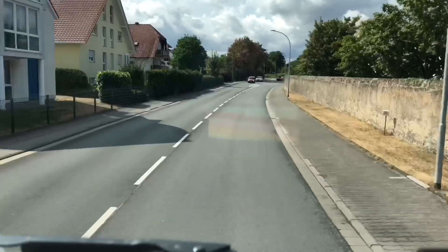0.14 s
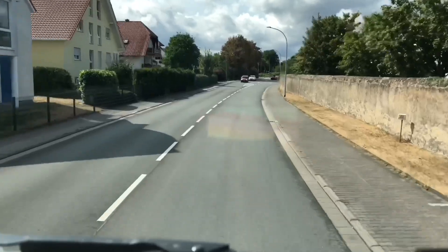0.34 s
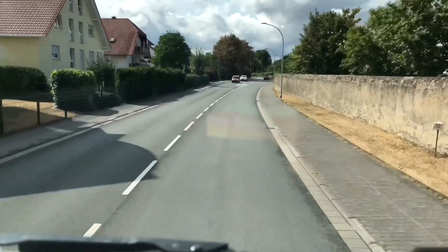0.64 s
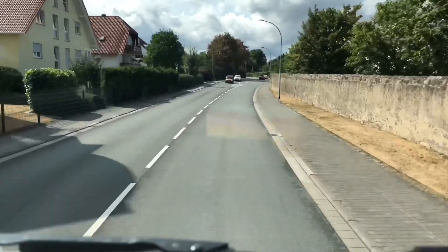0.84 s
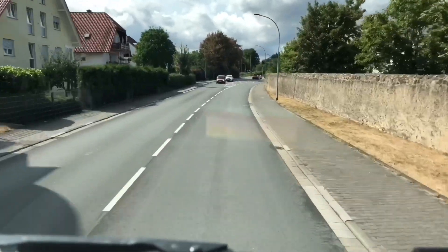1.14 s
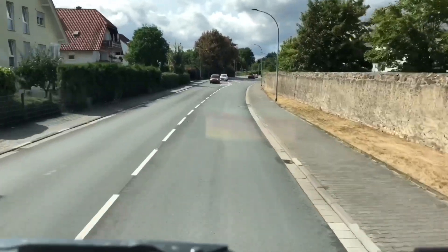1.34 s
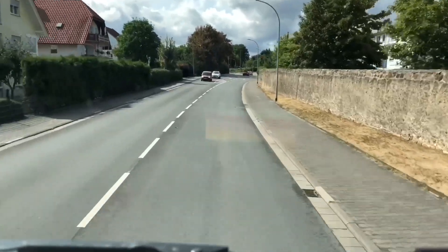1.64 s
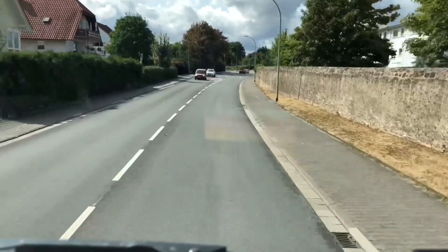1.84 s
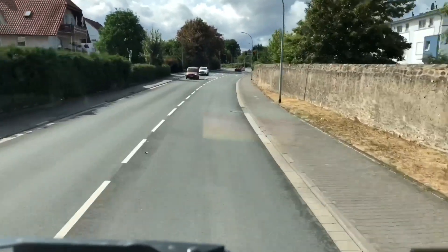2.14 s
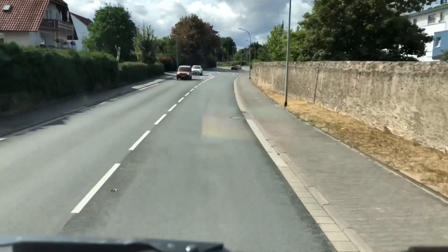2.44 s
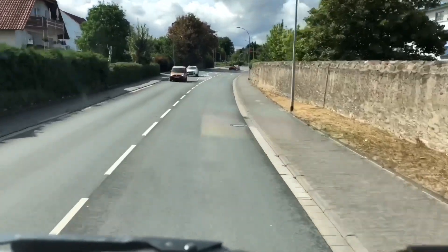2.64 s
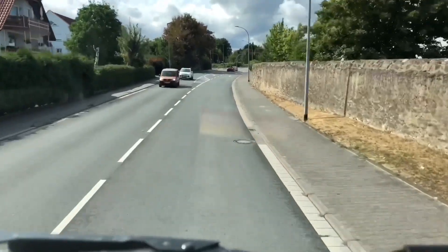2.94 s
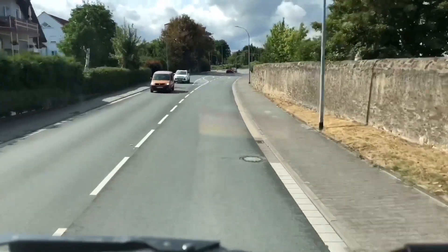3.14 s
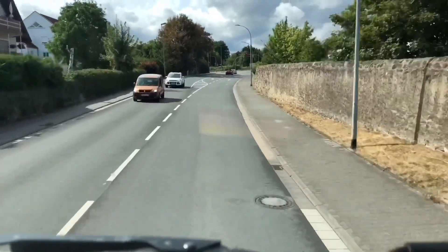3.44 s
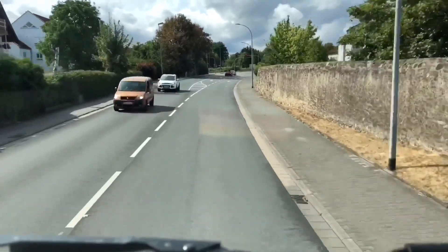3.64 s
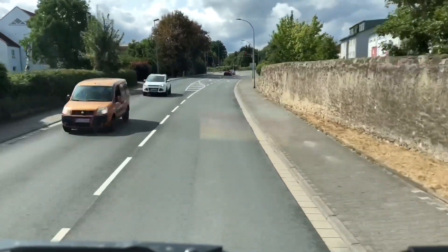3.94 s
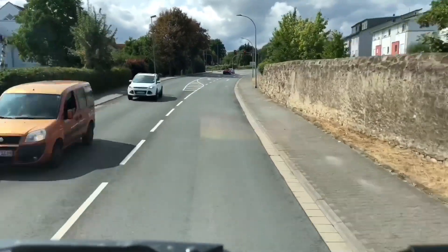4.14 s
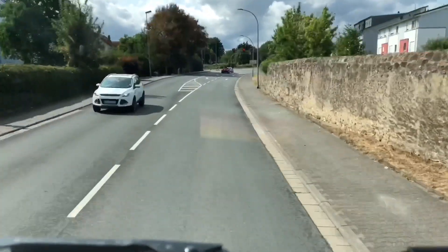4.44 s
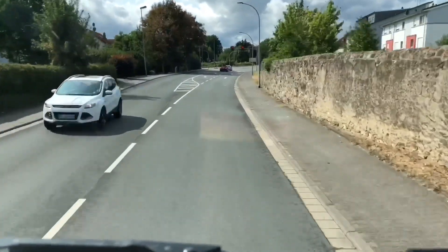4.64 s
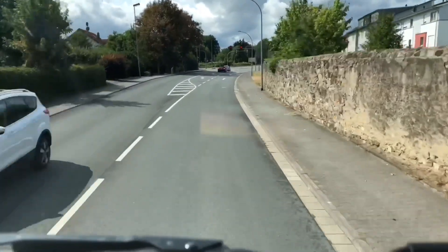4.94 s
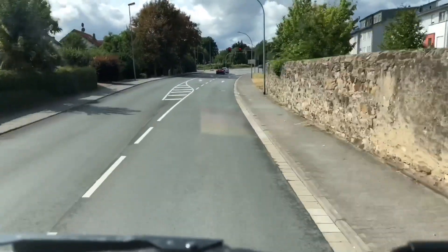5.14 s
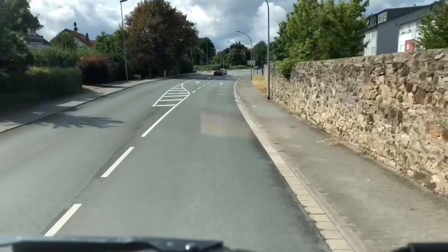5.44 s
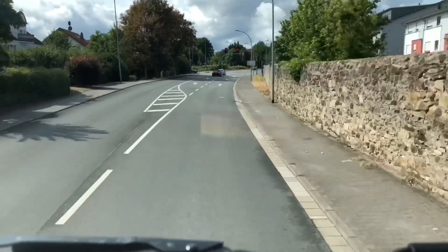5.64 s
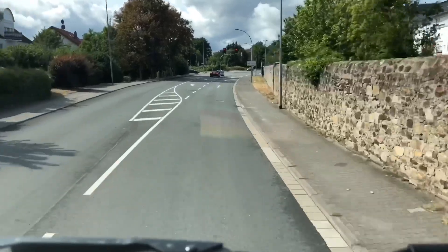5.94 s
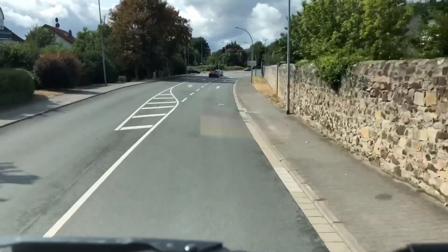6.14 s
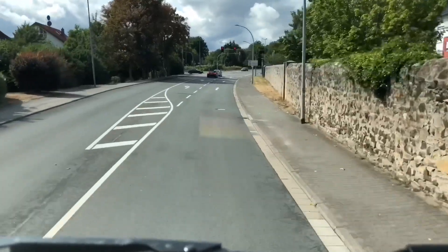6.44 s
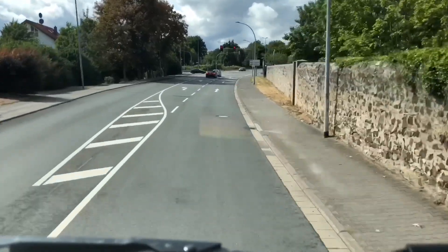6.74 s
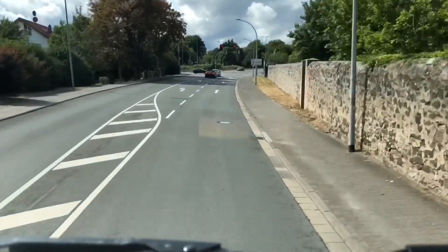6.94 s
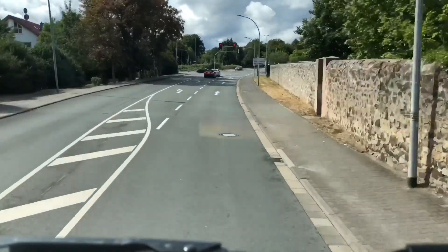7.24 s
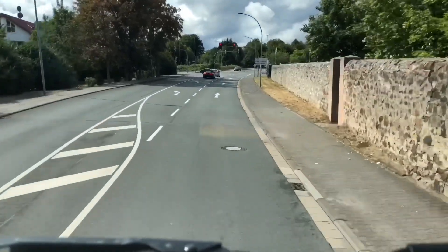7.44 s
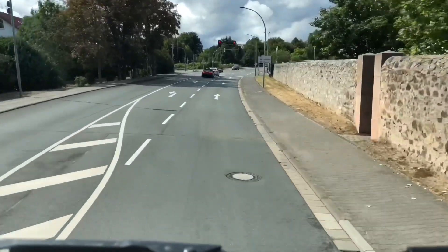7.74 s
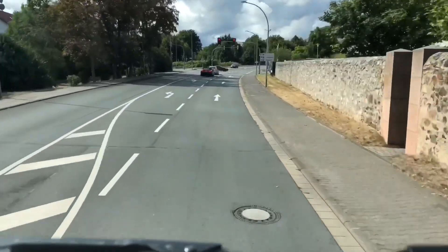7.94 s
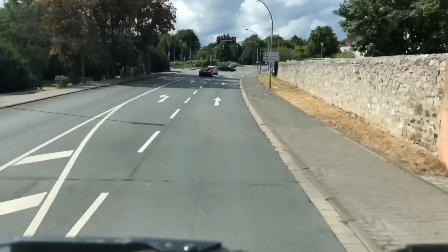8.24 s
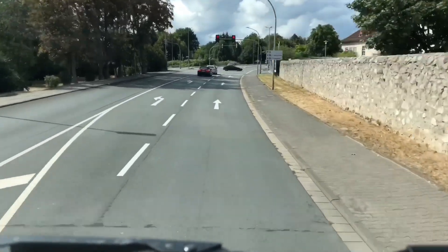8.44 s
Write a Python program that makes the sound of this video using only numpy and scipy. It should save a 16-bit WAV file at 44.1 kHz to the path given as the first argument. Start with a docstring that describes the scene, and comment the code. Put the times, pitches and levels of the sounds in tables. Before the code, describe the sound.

Inside the cab of a heavy truck on a road, a six-cylinder diesel booms and clatters under full load, with gear whine and bright intake hiss. It lifts for an upshift, its pitch drops and the turbo whistle sinks. A softer second pull follows, then coasting over tyre wash and road rumble. A strong air blow-off spits out past six seconds, and rushing air swells at the end.

```python
"""Inside the cab of a six-cylinder diesel truck that pulls hard, shifts up at 1.5 s, pulls again and slows.
Sines locked to the engine cycle make the boom, the air compressor that beats against it, and the gear whine.
Clatter is noise, partly repeated in every cycle; the turbo is a gliding noise band that sinks after each pull.
Filtered noise gives road, tyres, intake, one strong blow-off among weaker puffs, and rushing air that swells
at the end."""
import sys
import numpy as np
from scipy import signal
from scipy.fft import rfft, irfft
from scipy.io import wavfile

SR = 44100
rng = np.random.default_rng(int(sys.argv[2]) if len(sys.argv) > 2 else 0)


def generate_wav(signal):
    """Clip the signal to [-1, 1] and save it as 16-bit WAV at the path in sys.argv[1]."""
    frames = np.transpose(np.atleast_2d(signal))
    scaled = np.clip(frames, -1, 1) * 32767
    pcm = np.round(scaled).astype(np.int16)
    wavfile.write(sys.argv[1], SR, pcm)


N = 379701  # samples
T = np.arange(N) / SR  # time [s]
HZ = np.fft.rfftfreq(N, 1 / SR)  # frequency of each spectral bin [Hz]

# An order is a multiple of the four-stroke cycle (two revolutions); six cylinders fire in each cycle.
FIRING_ORDER = 6
COMPRESSOR_ORDER = 5.653
FULL_POWER_RPM = 1788
FIRING_COAST_DB, FIRING_PULL_DB = -36.8, -22  # before the lift of the cab modes
TURBO_IDLE_HZ, TURBO_COAST_S = 7700, 1.15  # pitch the run-down approaches, and its time constant
EDGE_HZ = 15740  # upper band limit

# Relative noise spectra: f/Hz, level/dB (per Hz)
# tyre and body rumble
ROAD_SPECTRUM = [(20, -28), (40, -13), (62, -8), (90, -8), (130, -1), (190, -2.5), (270, -5), (340, -4),
                 (470, -14), (650, -15.5), (950, -24), (2000, -50)]
# steady wash of the tyres heard through the glass
WASH_SPECTRUM = [(300, -24), (800, -6), (1200, 2.5), (1700, -9), (2300, -7), (2900, -10), (3800, -7),
                 (4900, -9), (6200, -11), (7200, -14), (9000, -14), (11000, -19.5), (13000, -32),
                 (15700, -42)]
# rushing air
AIR_SPECTRUM = [(500, -3), (1400, -7.5), (2400, .5), (3200, 1), (4600, -7.5), (6300, -8), (7200, -10),
                (10000, -12), (12500, -18), (15700, -23)]
# intake hiss
INTAKE_SPECTRUM = [(500, -32), (1400, -1.5), (2400, -.5), (3200, 0.5), (4200, -1.5), (5100, -3.5),
                   (6300, -9), (7000, -11), (10000, -11), (12500, -15.5), (15700, -18.5)]
# puffs of the air system
PURGE_SPECTRUM = [(1500, -28), (3200, -6), (4500, -5), (6000, -2), (7500, -4), (10000, -1.5), (13000, -4),
                  (15700, -8)]
# combustion clatter
ROAR_SPECTRUM = [(40, -35), (90, 2), (180, 2), (320, 1), (460, -1), (700, -1), (900, -4.5), (1300, -6),
                 (1700, -13.5), (2400, -18.5), (5000, -38), (16000, -70)]

# Resonances of cab panels and engine covers: f/Hz, width/Hz, peak level/dB
PANEL_MODES = [(259, 9.9, 1), (713, 56, 1.5), (1032, 160, 2.5), (1390, 56, 6.5), (1590, 120, 1.5),
               (1760, 47, 3.5), (1940, 140, 0.5), (2316, 240, 5), (2757, 54, 3.5), (3000, 100, 3.5),
               (3100, 150, -5), (5000, 200, 2), (6060, 300, 1), (8800, 400, 0.5)]
# Air resonances of the cab: f/Hz, width/Hz, peak level/dB
CAB_AIR_MODES = [(67, 12, 8.5), (97.5, 5.9, 3.5), (135.3, 12, 13.5), (158.8, 12, 7.5), (194.6, 11.6, 13),
                 (262.7, 8.5, 8.5)]

# Engine speed: t/s, speed/(revolutions per minute)
ENGINE_SPEED = [(0, 1680), (.5, 1748), (1.05, 1815), (1.5, 1763), (1.75, 1631), (2.05, 1480), (2.4, 1412),
                (3, 1444), (3.55, 1476), (3.9, 1452), (4.15, 1472), (4.45, 1448), (4.9, 1464), (5.6, 1449),
                (6.4, 1421), (7, 1398), (7.8, 1343), (8.61, 1288)]
# Driver's foot, full pull, lift for the shift, second pull, ease off: t/s, load/(0 to 1)
ENGINE_LOAD = [(0, 1), (1.08, 0.9), (1.42, 0.48), (1.58, 0.08), (2.2, 0.02), (2.6, .33), (2.92, 0.63),
               (3.2, 0.57), (3.58, 0.78), (3.85, 0.29), (4.35, 0.05), (8.61, 0.11)]

# Swelling of the rushing air, before trim: t/s, level/dB
RUSH_LEVEL = [(0, -65), (4.5, -70), (5.4, -51), (6.15, -48.5), (7.1, -46.5), (7.8, -42), (8.05, -39),
              (8.61, -39)]
# Air-system puffs: start t/s, level/dB, hold t/s, decay time by 60 dB t/s
AIR_PUFFS = [(6.16, -53, 0.041, .2), (6.335, -34.5, 0.095, 0.72), (7.161, -53, .03, .2),
             (7.6, -58, .05, .2)]
# Whistle of the intake under full boost: t/s, f/Hz, level/dB
BOOST_WHISTLE = [(0, 11650, -56), (.8, 11540, -59), (1.15, 11300, -54), (1.35, 10790, -61),
                 (1.6, 9990, -72)]
# Whine of the driveline: t/s, f/Hz, level/dB
DRIVELINE_WHINE = [(3.9, 2172, -57), (5.5, 2158, -56), (6.5, 2114, -54), (7.4, 2047, -55.5),
                   (7.8, 1999, -64)]
# Whistle of a leaking air valve: t/s, f/Hz, level/dB
VALVE_WHISTLE = [(6.5, 4232, -70), (6.65, 4230, -50), (7.1, 4140, -54), (7.55, 4110, -54), (7.7, 4090, -70)]
# Turbo spooling up in the second pull: t/s, f/Hz, level/dB
TURBO_SPOOL_UP = [(2.5, 11800, -68), (2.95, 12270, -66), (3.3, 15320, -63), (3.5, 16400, -66)]
# Turbo run-downs: start t/s, end t/s, f at the start/Hz, level at the start/dB, fade/(dB per s)
TURBO_RUN_DOWNS = [(1.45, 2.4, 17150, -52, 20), (3.8, 6.1, 16750, -56.5, 3)]
# Gear meshes, before trim: tooth-mesh order, start t/s, end t/s, level at mid-time/dB, swell/(dB per s)
GEAR_MESHES = [(24.75, -.1, .6, -37.5, 0), (31, -.1, .6, -38, 0), (49.5, -.1, .86, -31.5, 3),
               (49.7, .82, 1.36, -41, 0), (74.4, -.1, 1.31, -35.5, 3), (64, 2.75, 3.65, -42, 2),
               (96, 2.75, 3.4, -43, -5), (31, 6.6, 7.9, -41, 0), (60.5, 6.7, 7.9, -45, 0)]
# Drone an octave above the firing rate: t/s, level/dB
DRONE_LEVEL = [(0.05, -18.5), (0.33, -28), (0.55, -18.5), (0.85, -16), (1.25, -27), (1.48, -27.5),
               (1.68, -18.5), (1.97, -36.5), (2.12, -25), (2.5, -28), (3.5, -20.5), (4.45, -31.5),
               (4.95, -26), (6.45, -32.5), (6.95, -23), (7.75, -40.5), (8.61, -29)]
# Lines that unequal cylinders add around the firing orders: order
UNEQUAL_ORDERS = [4, 5, 7, 8, 9, 10, 11, 13, 14, 15, 16, 17, 18, 19, 20, 21, 22, 23]
# One row for each unequal order, before trim and cab modes: level coasting/dB, level at full load/dB
UNEQUAL_LEVELS = [(-54, -47), (-50, -48), (-42.5, -36.5), (-52, -30.5), (-35.5, -31), (-40, -31.5),
                  (-53, -46), (-57, -46), (-43, -39), (-47, -39), (-58, -52), (-52, -43), (-52.5, -37),
                  (-55.5, -47), (-54.5, -45.5), (-56, -49), (-48, -54), (-58, -43)]


def gain_of(db):
    """Logarithmic law: 20 dB is a tenfold amplitude."""
    return 10 ** (np.asarray(db) / 20)


def evened(x):
    """Normalisation: equal mean-square power, rms 1."""
    return x / np.sqrt(np.mean(x ** 2) + 1e-20)


def curves(rows):
    """Linear interpolation: each column of a table becomes a curve over time."""
    s, *columns = np.transpose(rows)
    return [np.interp(T, s, c) for c in columns]


def read(points, hz):
    """Logarithmic frequency scale: straight lines join the points of a spectrum."""
    f, value = np.transpose(points)
    return np.interp(np.log(hz + 1), np.log(f + 1), value)


def drift(rate_hz):
    """Low-passed random process: a smooth wander of rms 1, changing at up to about rate_hz."""
    slow_hz = np.fft.rfftfreq(2048, T[-1] / 2048)
    spectrum = rfft(rng.standard_normal(2048)) / (1 + (slow_hz / rate_hz) ** 4)
    wander = irfft(spectrum)
    return evened(np.interp(T, np.linspace(0, T[-1], len(wander)), wander))


def peaks_db(resonances, hz):
    """Resonance: each mode shifts the level in dB by a bell-shaped peak around its centre."""
    return sum(peak / (1 + (2 * (hz - centre) / width) ** 2) for centre, width, peak in resonances)


def in_cab(x, spectrum, ripple_db=2.5, ripple_hz=45):
    """Linear filtering: source spectrum, panel resonances and the fine ripple of the cab's reflections."""
    db = read(spectrum, HZ) + peaks_db(PANEL_MODES, HZ)
    ripple = np.interp(HZ / ripple_hz, np.arange(1024), rng.standard_normal(1024))
    ripple_share = np.interp(HZ, [300, 1200, 5000, 9000], [0, 1, .9, .4])
    response = gain_of(db + ripple_db * ripple_share * ripple)
    return evened(irfft(rfft(x) * response, N))


def tone(turns):
    """Harmonic motion: a sine of rms 1 whose phase is given in turns."""
    return np.sqrt(2) * np.cos(2 * np.pi * turns)


def fuzzy(turns, width_hz):
    """Quadrature modulation: slow noise on a carrier makes a soft-skirted band around a moving pitch."""
    keep = np.exp(-np.pi * width_hz / SR)
    slow = rng.standard_normal((2, N))
    for _ in range(3):
        slow = signal.lfilter([1 - keep], [1, -keep], slow)
    return evened(slow[0] * tone(turns) + slow[1] * tone(turns + 1 / 4))


def hiss(spectrum, db, bright_db, flutter_db=0.72, split_hz=6500):
    """Turbulent flow: fluttering broadband noise whose top brightens and dulls."""
    flow = in_cab(rng.standard_normal(N), spectrum)
    top = irfft(rfft(flow) * HZ ** 4 / (HZ ** 4 + split_hz ** 4), N)
    brightened = flow - top + gain_of(bright_db) * top
    return gain_of(db + flutter_db * drift(15)) * brightened


def tyres(level_db=-45, swell_db=0.84):
    """Stationary noise: an even wash independent of the engine, so it stays when that falls quiet."""
    return gain_of(level_db + swell_db * drift(2.4)) * in_cab(rng.standard_normal(N), WASH_SPECTRUM)


def road(level_db=-29.7, bumps_db=1.5, rise_db_per_s=.12):
    """Random excitation: uneven asphalt makes tyre and body rumble swell, over a slow growth."""
    db = level_db + rise_db_per_s * T + bumps_db * drift(4.6)
    return gain_of(db) * in_cab(rng.standard_normal(N), ROAD_SPECTRUM)


def rush(trim_db=2.5, top_bright_db=5.5, bright_per_db=1.3,
         hum_hz=225, hum_width_hz=55, hum_db=-30.5, hum_per_db=2.0):
    """Flow noise: rushing air is brighter the harder it blows, with a low hum at its strongest."""
    db, = curves(RUSH_LEVEL)
    slack_db = db - db.max()  # 0 at the strongest flow, negative elsewhere
    hum = gain_of(hum_db + hum_per_db * slack_db) * fuzzy(hum_hz * T, hum_width_hz)
    return hum + hiss(AIR_SPECTRUM, db + trim_db, top_bright_db + bright_per_db * slack_db)


def intake(power, load, idle_db=-49.0, boost_db=14.6, lag_s=0.25,
           idle_bright_db=-4, boost_bright_db=5, lift_bright_db=5):
    """First-order lag: boost trails power, so the hiss is dull as it builds and bright when the foot lifts."""
    keep = np.exp(-1 / (lag_s * SR))
    boost = power[0] + signal.lfilter([1 - keep], [1, -keep], power - power[0])
    bright_db = idle_bright_db + boost_bright_db * boost + lift_bright_db * (boost - load)
    return hiss(INTAKE_SPECTRUM, idle_db + boost_db * boost, bright_db)


def puffs(rise_s=.01):
    """Pressure release: a valve snaps open, blows briefly, and the noise decays exponentially."""
    blow = np.zeros(N)
    for start, db, hold, t60 in AIR_PUFFS:
        opening = np.clip((T - start) / rise_s, 0, 1)
        decay_db = 60 * np.maximum(T - start - hold, 0) / t60
        blow += gain_of(db - decay_db) * opening
    return blow * in_cab(rng.standard_normal(N), PURGE_SPECTRUM)


def whistle(rows, width_hz, flicker_db=1.2):
    """Narrow-band noise: a breathy, flickering whistle glides along its table."""
    hz, db = curves(rows)
    sounding = (T >= rows[0][0]) & (T <= rows[-1][0])
    return sounding * gain_of(db + flicker_db * drift(11)) * fuzzy(np.cumsum(hz) / SR, width_hz)


def turbo(width_hz=1500, core_width_hz=380, core_db=1, skirt_fade_db_per_s=8, flicker_db=2.0, edge_s=0.15):
    """Exponential relaxation: after each pull the blade whistle sinks towards idle pitch, narrows and fades."""
    out = whistle(TURBO_SPOOL_UP, width_hz=1100)
    for start, end, top_hz, db, fade in TURBO_RUN_DOWNS:
        age = np.maximum(T - start, 0)
        hz = TURBO_IDLE_HZ + (top_hz - TURBO_IDLE_HZ) * np.exp(-age / TURBO_COAST_S)
        turns = np.cumsum(hz) / SR
        sounding = np.clip(np.minimum(age, end - T) / edge_s, 0, 1)
        # the wide band gives way to a narrow core
        skirt = gain_of(-skirt_fade_db_per_s * age)
        core = gain_of(core_db) * fuzzy(turns, core_width_hz)
        blades = skirt * fuzzy(turns, width_hz) + (1 - skirt) * core
        out += sounding * gain_of(db - fade * age + flicker_db * drift(11)) * blades
    return out


def compressor(cycles, rpm, level_db=-28, fall_db_per_rpm=0.13, loud_rpm=1350, upper_db=-13):
    """Beats: geared just under the firing rate, it beats with the boom about four times a second."""
    turns = COMPRESSOR_ORDER * cycles
    db = level_db - fall_db_per_rpm * np.maximum(rpm - loud_rpm, 0)  # loudest at low speed
    upper = gain_of(upper_db) * tone(turns * 3 / 2)  # a fifth above
    return gain_of(db) * (tone(turns) + upper)


def gearbox(cycles, rough=0.73, width_hz=70, trim_db=-1.0, surge_db=3, surge_hz=7, engage_s=0.098):
    """Tooth-mesh excitation: loaded teeth whine in short surges; uneven teeth smear each line."""
    out = np.zeros(N)
    for order, start, end, db, swell in GEAR_MESHES:
        engaged = np.clip(np.minimum(T - start, end - T) / engage_s, 0, 1)
        swell_db = swell * (T - (start + end) / 2)
        level = gain_of(db + trim_db + swell_db + surge_db * drift(surge_hz))
        whine = evened(tone(order * cycles) + rough * fuzzy(order * cycles, width_hz))
        out += engaged * level * whine
    return out


def roar(cycles, roar_db, repeat=0.46, pulsing=0.059, trim_db=0.5, renew_s=0.605):
    """Cyclic excitation: clatter partly repeats each engine cycle, slowly changing, and is partly fresh noise."""
    place = cycles % 1 * 1024  # position within the cycle's pattern
    repeating = np.zeros(N)
    for k, pattern in enumerate(rng.standard_normal((32, 1024))):
        # neighbouring patterns cross-fade at constant power
        near = abs(T / renew_s - k) < 1
        fade = np.cos(np.pi / 2 * (T[near] / renew_s - k))
        repeating[near] += fade * np.interp(place[near], np.arange(len(pattern)), pattern)
    # fresh noise pulses at the firing rate
    fresh = rng.standard_normal(N) * (1 + pulsing * tone(FIRING_ORDER * cycles))
    repeating_part = np.sqrt(repeat) * in_cab(repeating, ROAR_SPECTRUM)
    fresh_part = np.sqrt(1 - repeat) * in_cab(fresh, ROAR_SPECTRUM)
    return gain_of(roar_db + trim_db) * (repeating_part + fresh_part)


def boom(cycles, rpm, load, waver_db=1.0, side_waver_db=2.6, side_db=0.8, saturation=1.6):
    """Forced resonance: firing and side orders follow load and swell as they cross the cab's air modes."""
    pull = 1 - np.clip(1 - load, 0, 1) ** saturation  # levels off near full load

    def level_db(order, coast_db, pull_db):
        """Superposed levels: the load's share plus the lift of the cab modes at the order's frequency."""
        return coast_db + (pull_db - coast_db) * pull + peaks_db(CAB_AIR_MODES, order * rpm / 120)

    firing_db = level_db(FIRING_ORDER, FIRING_COAST_DB, FIRING_PULL_DB) + waver_db * drift(2.5)
    firing = gain_of(firing_db) * tone(FIRING_ORDER * cycles)
    drone_db = curves(DRONE_LEVEL)[0] + waver_db * drift(4)
    drone = gain_of(drone_db) * tone(2 * FIRING_ORDER * cycles + 1 / 2)
    sides = np.zeros(N)
    for order, levels in zip(UNEQUAL_ORDERS, UNEQUAL_LEVELS):
        db = level_db(order, *levels) + side_waver_db * drift(2.25)
        sides += gain_of(db) * tone(order * cycles + rng.random())
    return firing + drone + gain_of(side_db) * sides


def scene(roar_coast_db=-36.0, roar_power_db=10.0):
    """Superposition: engine speed and load drive the engine's sounds; road and air add their noise."""
    rpm, = curves(ENGINE_SPEED)
    load, = curves(ENGINE_LOAD)
    cycles = np.cumsum(rpm / 120) / SR  # two revolutions a cycle
    power = load * (rpm / FULL_POWER_RPM) ** 1.05

    background = tyres() + road() + rush() + intake(power, load) + puffs()
    whistles = turbo() + whistle(BOOST_WHISTLE, width_hz=650)
    whistles += whistle(DRIVELINE_WHINE, width_hz=55) + whistle(VALVE_WHISTLE, width_hz=130)
    engine = compressor(cycles, rpm) + gearbox(cycles)
    engine += roar(cycles, roar_coast_db + roar_power_db * power) + boom(cycles, rpm, load)
    return (background + whistles + engine)[None]


def record(dry):
    """Band limitation: a linear-phase low-pass removes what lies above the band edge."""
    low_pass = signal.firwin(1023, EDGE_HZ, window=("kaiser", 9), fs=SR)
    return signal.oaconvolve(dry, low_pass[None], "same")


dry = scene()
out = record(dry)
generate_wav(out)
```